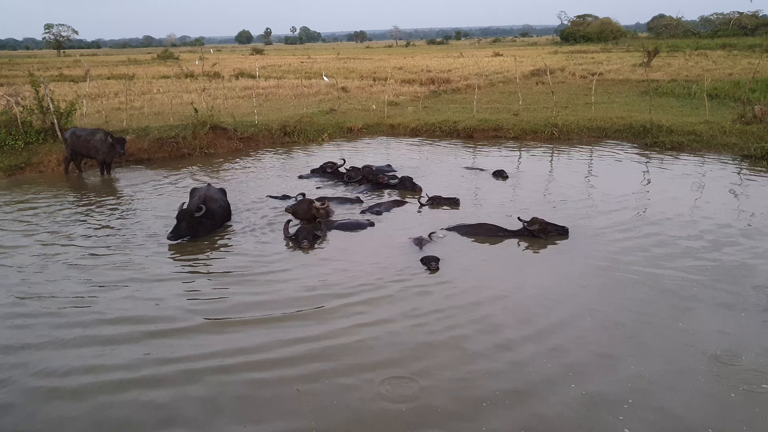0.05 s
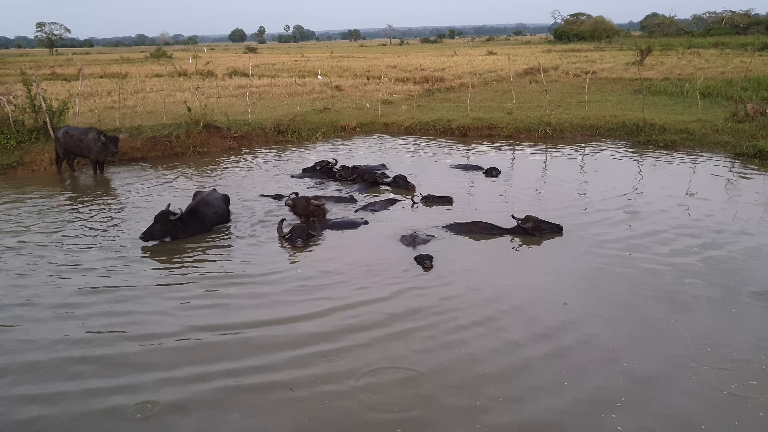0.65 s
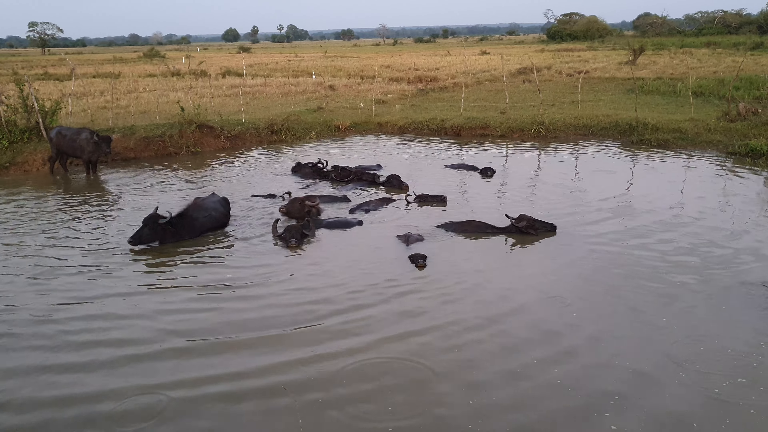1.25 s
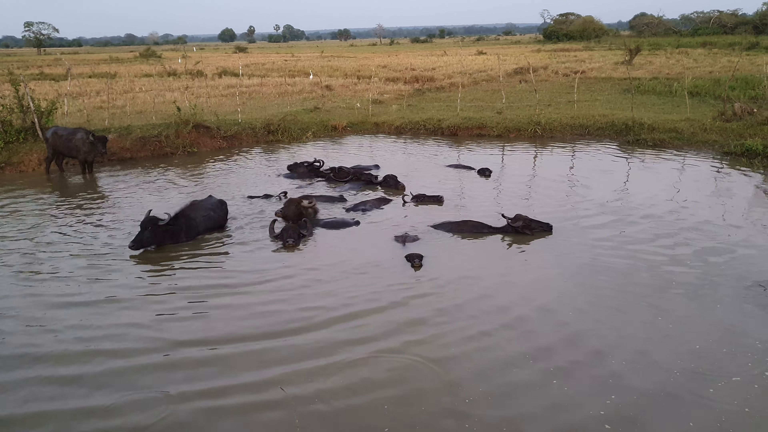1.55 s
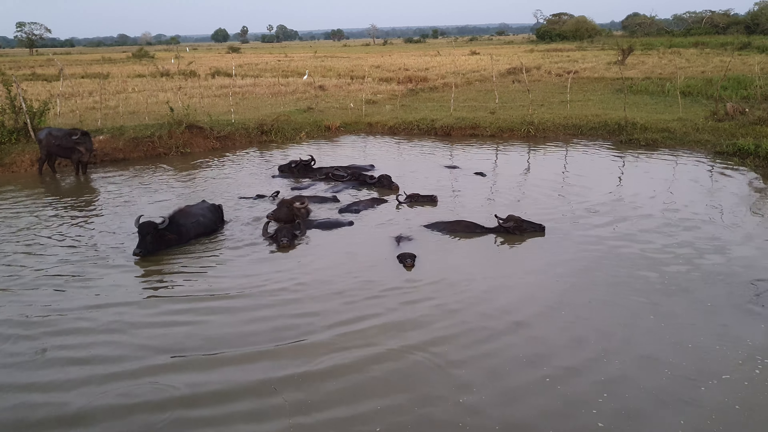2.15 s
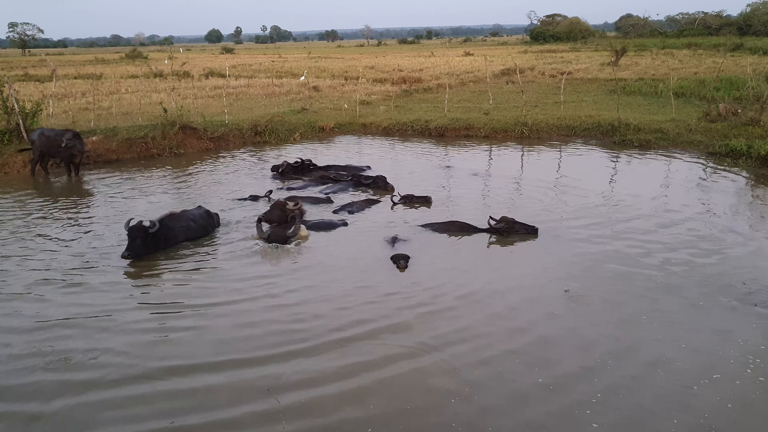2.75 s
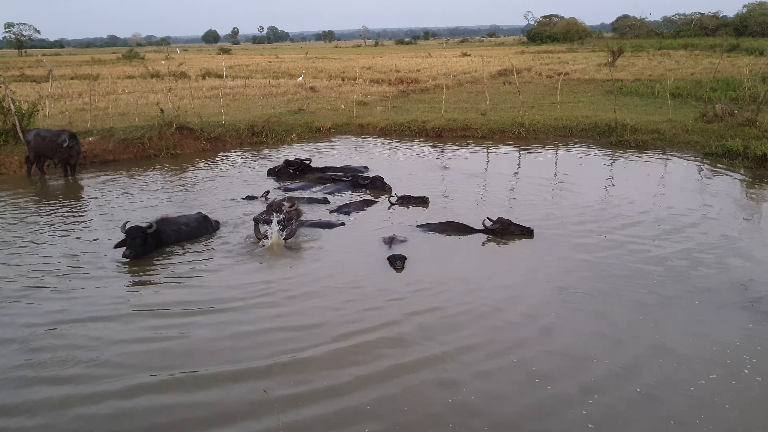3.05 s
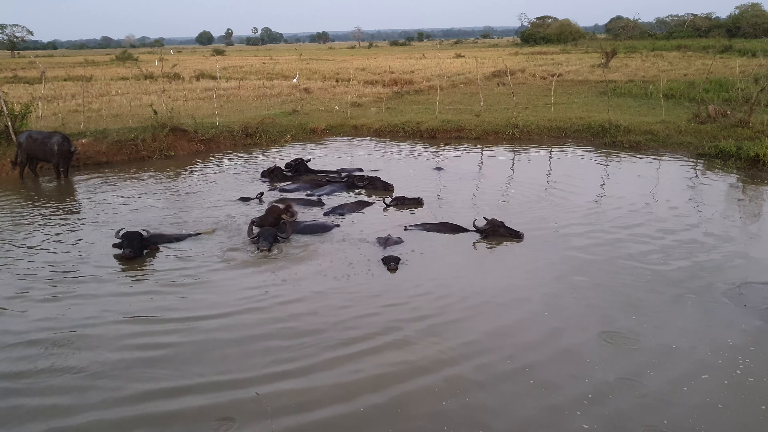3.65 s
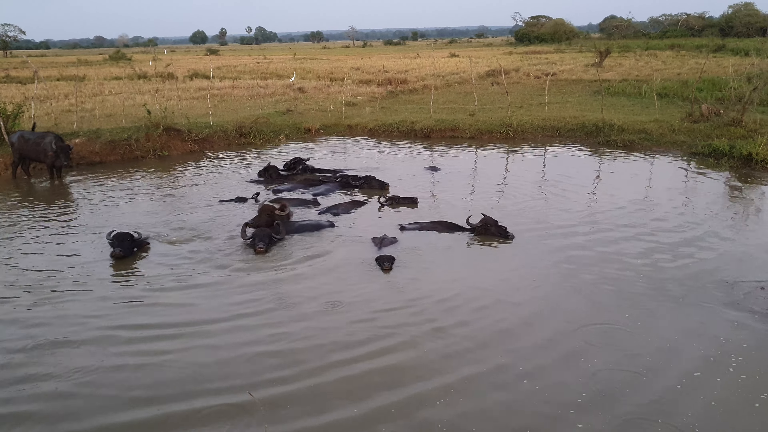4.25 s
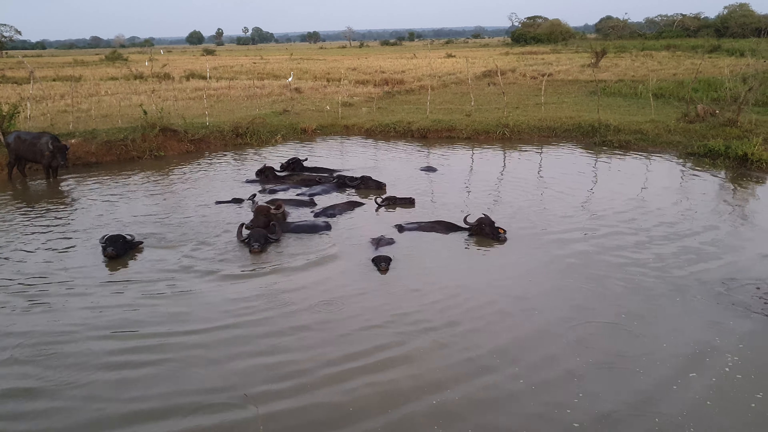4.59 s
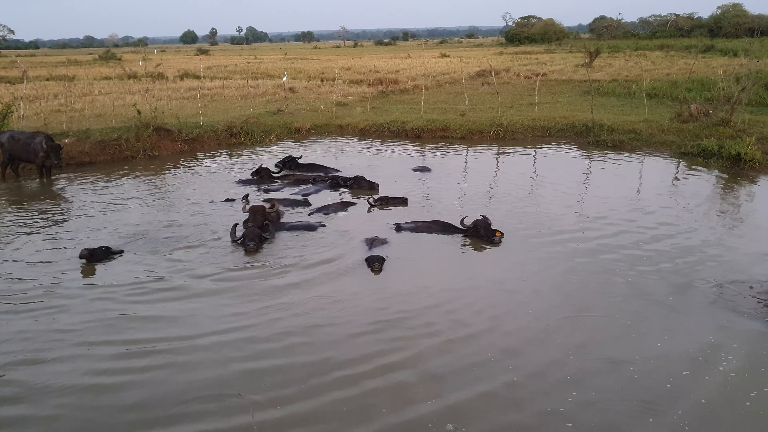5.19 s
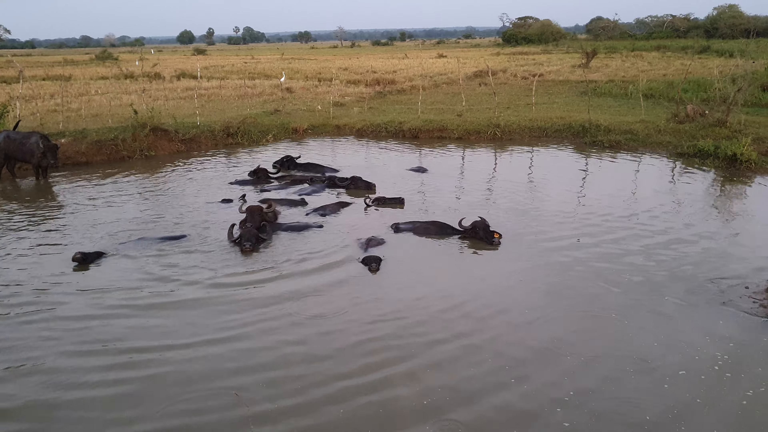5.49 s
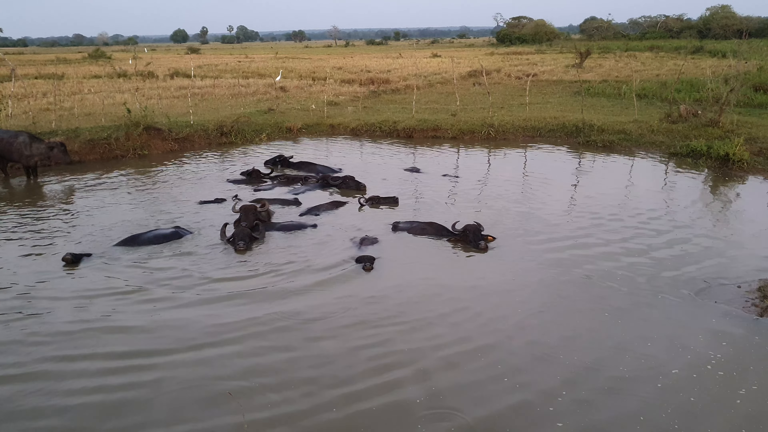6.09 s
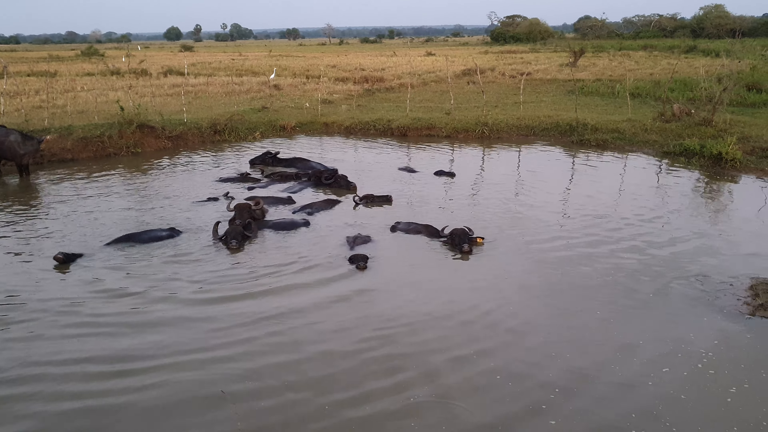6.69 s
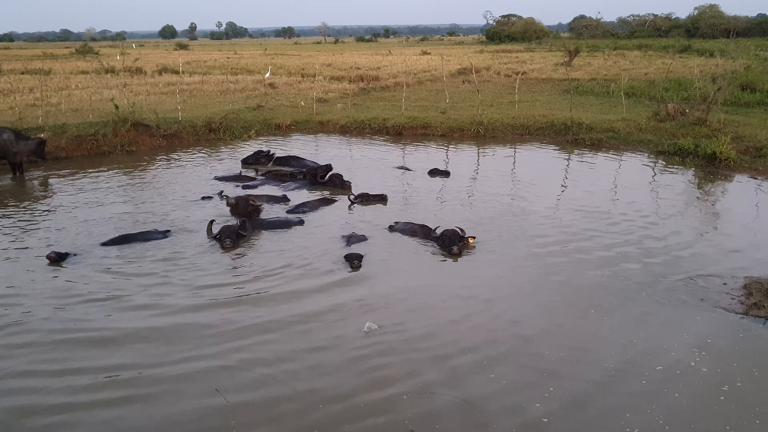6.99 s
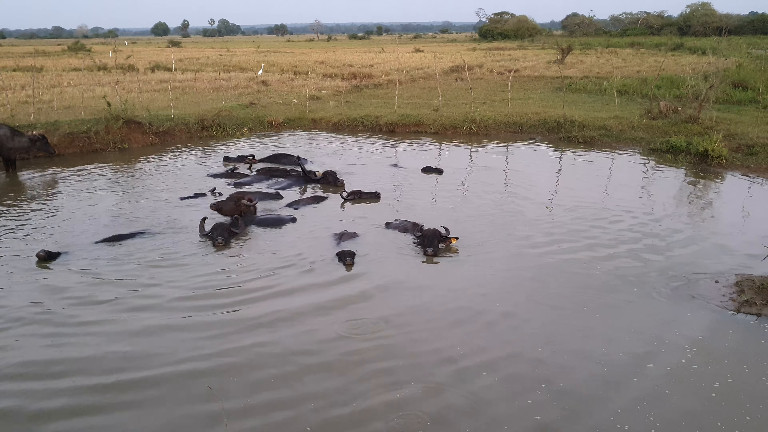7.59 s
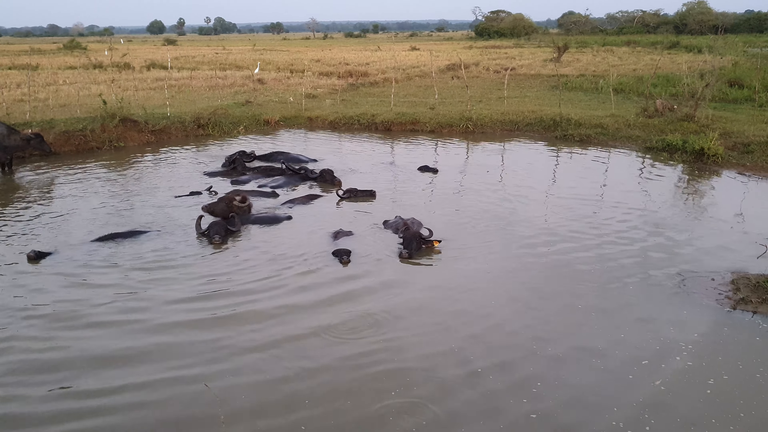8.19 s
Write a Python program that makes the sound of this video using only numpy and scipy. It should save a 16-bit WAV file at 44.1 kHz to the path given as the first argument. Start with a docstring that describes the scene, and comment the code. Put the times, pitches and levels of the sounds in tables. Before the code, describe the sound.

Wind buffets the microphone over buffalo wallowing in a pond, with surging splashes, plops, faint bird chirps and insects.

```python
"""Wind rumbles and thumps as gusts buffet the two microphone ports in turn.
Water buffalo wallow in a pond some way off: heaving and wading bodies drive surges of ringing
bubbles and spray, and water pours back with slaps and plops. A small bird slurs a few notes,
then repeats a quick two-note chip. Insects hiss in the fields."""
import sys
import numpy as np
from scipy import signal
from scipy.fft import rfft, irfft, next_fast_len
from scipy.io import wavfile
from scipy.ndimage import map_coordinates

SR = 44100
rng = np.random.default_rng(int(sys.argv[2]) if len(sys.argv) > 2 else 0)


def master_out(mix):
    """Clip the mix to full scale and print it as 16-bit PCM to the path in sys.argv[1]."""
    frames = np.transpose(np.atleast_2d(mix))
    ceiling = np.clip(frames, -1, 1)
    pcm = np.round(ceiling * 32767).astype(np.int16)
    wavfile.write(sys.argv[1], SR, pcm)


N = 372204

# fine spray spectrum: freq_hz, level_db
SPRAY_SPECTRUM = [(3000, -38), (6000, 8.5), (8000, -10), (9500, -1), (12000, -2.5), (14200, -0.5),
                  (15800, -5)]


def wind():
    """Each port has its own lumpy rumble; more swirl breaks it into finer, brighter eddies."""
    # spectra: freq_hz, level_db
    rumble_spectrum = [(12, -37), (25, -21.5), (45, -1), (62, 2.5), (100, -2), (150, -13), (220, -20),
                       (350, -47.5), (600, -79)]
    eddy_spectrum = [(50, -30), (110, -4), (180, 0.5), (280, -6.5), (400, -16.5), (600, -29), (1200, -95)]
    # single eddies hitting one port: centre_s, level_db, pitch_hz, port (0 left, 1 right)
    buffets = [(0.039, -16, 171, 1), (0.205, -20, 71.4, 0), (0.407, -18, 84, 1), (0.734, -26, 370, 0),
               (0.735, -6, 131, 0), (0.775, -16.5, 167, 0), (0.826, -16, 146, 1), (0.932, -16.5, 162, 1),
               (1.091, -17.5, 188, 1), (1.101, -14.5, 102, 0), (1.162, -13.5, 100, 0), (1.248, -19, 74, 1),
               (1.373, -16.5, 130, 1), (1.477, -14, 134, 1), (1.907, -16.5, 118, 1), (2.026, -11.5, 92, 1),
               (2.303, -20, 89, 1), (2.592, -16, 74, 1), (4.29, -16.5, 117, 1), (4.34, -19.5, 135, 1),
               (4.432, -18, 90.5, 1), (4.841, -26, 91, 1), (5.162, -18, 72.5, 0), (5.421, -19.5, 105, 1),
               (7.125, -15.5, 73.5, 0), (8.016, -21, 80, 0)]
    flow_db, swirl_db = air_flow()
    lumps = np.array([wobble(22), wobble(22)])
    rumble = amp(flow_db + 2) * unit(amp(2 * lumps) * coloured(noise(), rumble_spectrum))
    eddy_db = -46 + 1.77 * (swirl_db + 35) + np.array([[-5], [1]])
    eddies = amp(eddy_db) * unit(amp(5.5 * lumps) * coloured(noise(), eddy_spectrum))
    ports = rumble + eddies
    t = np.arange(-SR // 28, SR // 28) / SR
    for centre_s, level_db, pitch_hz, port in buffets:
        turns = np.arcsinh(t * pitch_hz * 2.965) / 2.07  # steep middle, slow flanks
        pressure = np.sin(2 * np.pi * turns + rng.uniform(0, 2 * np.pi)) * np.exp(-(turns / 0.71) ** 2)
        add(ports[int(port)], centre_s + t[0], amp(level_db - 3) * pressure)
    return ports


def air_flow():
    """Flow and swirl per port in dB: bell-shaped gusts, smooth or turbulent, ride on the breeze."""
    # breeze: time_s, left_db, right_db
    breeze = [(0, -42, -45.5), (.5, -45.5, -44.5), (.7, -36.5, -43), (1.25, -38, -34), (1.75, -40, -35.5),
              (2.2, -43.5, -41.5), (2.6, -41, -39.5), (3.55, -50, -42.5), (4.2, -43.5, -40),
              (4.6, -39, -40.5), (5.05, -42.5, -41.5), (5.35, -51, -36), (5.85, -49.5, -48.5),
              (6.45, -54, -52.5), (6.75, -43.5, -50), (7.25, -50.5, -58), (7.6, -49.5, -53),
              (8.44, -41, -49)]
    # gusts: centre_s, length_s, level_db, swirl_relative_db, port (0 left, 1 right)
    gusts = [(0.039, 0.038, -30.5, 0.5, 1), (0.285, 0.17, -32.5, -3, 1), (.6, 0.076, -30.5, -10, 0),
             (0.747, 0.07, -19.5, -4.5, 0), (.89, 0.093, -32, 1, 1), (1.132, 0.15, -30, -1.5, 0),
             (1.453, 0.1, -29.5, 3.5, 1), (2.11, 0.3, -32.5, 0, 1), (2.645, 0.082, -29.5, -17, 1),
             (3.157, 0.13, -32, -3.5, 1), (3.368, 0.11, -35.5, -5, 0), (3.848, 0.28, -33.5, -7, 1),
             (3.93, 0.086, -34.5, -8, 0), (4.13, 0.083, -31.5, -8, 1), (4.394, 0.19, -29.5, -2.5, 1),
             (4.837, 0.065, -26.5, 1, 1), (5.148, 0.1, -33.5, -2.5, 1), (5.317, 0.037, -29.5, 1, 1),
             (5.736, 0.072, -34.5, -4.5, 1), (6.01, 0.14, -35, -3, 1), (6.617, 0.032, -33.5, -7, 0),
             (7.0, 0.03, -29.5, -2, 1), (8.049, 0.097, -32, -10, 0), (8.328, 0.044, -32, 0, 0)]
    t = np.arange(N) / SR
    flow = amp(curves(breeze)) ** 2
    swirl = flow.copy()
    for centre_s, length_s, level_db, swirl_relative_db, port in gusts:
        gust = amp(level_db) ** 2 * np.exp(-(2 * (t - centre_s) / length_s) ** 2)
        flow[int(port)] += gust
        swirl[int(port)] += gust * amp(swirl_relative_db) ** 2
    return 10 * np.log10(flow), 10 * np.log10(swirl)


def water():
    """Mid and side: wading bodies gulp big bubbles, falling water makes small ones, spray crackles."""
    # spectra: freq_hz, level_db
    slosh_spectrum = [(120, -31), (230, 2), (340, -3.5), (440, -14), (570, -2), (800, 0), (1100, -3.5),
                      (1600, -3), (2300, -6.5), (5000, -61)]
    splash_spectrum = [(700, -28), (1400, -5.5), (2000, -4), (2350, -7), (2700, -2.5), (3000, -8.5),
                       (3400, -1), (4200, -2.5), (5200, -5), (6700, -6.5), (7600, -19), (10000, -18.5),
                       (15000, -41)]
    slosh_db, splash_db, spray_db = water_motion()
    churn = wobble(28)
    big = bubbles(per_s=450, centre_hz=785.4, spread=1.118, cycles=8.85, scatter_db=2.5, samples=1400)
    slosh = coloured(big + noise(), slosh_spectrum)
    small = bubbles(per_s=800, centre_hz=3244, spread=1.065, cycles=23, scatter_db=4, samples=500)
    splash = coloured(small + 1.47 * noise(), splash_spectrum)
    fine = bubbles(per_s=1500, centre_hz=10500, spread=0.99, cycles=0.9, scatter_db=3, samples=60)
    spray = coloured(fine + 0.5 * noise(), SPRAY_SPECTRUM)
    return (amp(slosh_db - 0.5) * unit(slosh * amp(0.78 * churn + wobble(15)))
            + amp(splash_db - 5.5) * unit(splash * amp(2 * churn))
            + amp(spray_db + 1.5) * unit(spray * amp(2.4 * churn)))


def water_motion():
    """Slosh, splash and spray in dB: each surge crests, then drains into the herd's general stir."""
    # stir between surges: time_s, level_db
    stir = [(0.0, -73), (0.73, -71.5), (0.91, -69), (1.74, -75.5), (2.61, -67.5), (2.72, -55), (2.87, -57),
            (3.15, -57.5), (3.81, -54.5), (4.28, -60), (4.63, -55.5), (5.31, -65), (5.66, -72), (5.99, -61),
            (6.82, -59), (7.29, -85), (7.64, -54), (8.44, -53)]
    # shares of the stir: slosh_db, splash_db, spray_db
    shares_db = [-2.5, 1.5, -20.5]
    # a body heaves or wades: crest_s, rise_s, fall_s, slosh_db, splash_db, spray_db
    surges = [(.1, .5, 0.48, -66.5, -84, -89), (.2, 0.12, 0.42, -67, -63, -79),
              (.92, 0.33, 0.35, -66, -64.5, -83), (1.19, 0.051, 0.07, -61, -66, -83),
              (1.48, 0.51, 0.27, -71.5, -65, -77), (2.02, 0.22, 0.18, -60, -60.5, -82),
              (2.36, 0.11, 0.034, -68.5, -57, -92), (2.52, 0.25, 0.35, -63.5, -83, -77),
              (2.73, 0.14, 0.068, -53.5, -55, -75), (2.91, 0.1, 0.17, -45, -45, -64),
              (3.45, 0.39, 0.31, -57, -52, -67), (3.87, 0.46, 0.45, -49, -57, -61.5),
              (4.76, 0.46, 0.29, -53.5, -64, -80), (5.17, 0.1, 0.18, -60.5, -54, -75),
              (5.6, 0.31, 0.31, -56.5, -52.5, -69), (6.07, 0.17, 0.093, -68, -50, -66),
              (6.64, 0.31, 0.17, -84, -50, -67), (6.96, 0.28, 0.26, -53, -49.5, -64),
              (7.52, 0.39, 0.31, -54.5, -49, -71), (7.95, 0.15, 0.17, -47, -43.5, -67)]
    depth_db, roundness = 17.5, 1.25
    t = np.arange(N) / SR
    power = amp(curves(stir) + np.array(shares_db)[:, None]) ** 2
    for crest_s, rise_s, fall_s, *layers_db in surges:
        from_crest = np.maximum((crest_s - t) / rise_s, (t - crest_s) / fall_s)
        envelope = amp(-depth_db * np.minimum(from_crest, 10) ** roundness)
        power += np.outer(amp(layers_db), envelope) ** 2
    return 10 * np.log10(power)


def slaps():
    """Mid and side: falling water smacks, trapped air resonates, mist lifts, big bubbles plop."""
    # smack spectrum: freq_hz, level_db
    smack_spectrum = [(300, -20), (800, -1), (1500, -3.5), (2700, 2.5), (4000, 2.5), (6500, -1.5),
                      (7800, -10.5), (15000, -26)]
    # water hitting the surface: start_s, level_db, mist_relative_db, tone_hz
    impacts = [(0.184, -42, -15.5, 5000), (0.83, -55, -8, 8000), (0.89, -44.5, -32, 3000),
               (0.9183, -48.5, -30, 3200), (0.9537, -40.5, -35, 3020), (1.1757, -39, -36, 1000),
               (1.195, -45, -24, 2200), (1.9127, -35.5, -29, 6500), (2.4886, -46, -16, 6050),
               (2.6753, -33, -18.5, 6200), (2.7814, -38.5, -17, 5500), (2.8654, -55, -12, 6000),
               (2.8933, -36, -24, 1600), (3.4424, -38, -16, 2600), (4.3402, -36, -29, 5800),
               (4.727, -42, -32, 2600), (5.437, -37, -40, 6000), (5.5204, -37, -36, 1200),
               (5.633, -46.5, -14, 5000), (5.74, -38, -22, 5540), (5.874, -46, -24, 1000),
               (5.9883, -37.5, -23, 1000), (6.4886, -37.5, -24, 3520), (6.561, -49, -9, 3500),
               (6.6243, -37.5, -18, 4530), (6.773, -39, -20, 3340), (6.897, -39, -28, 3500),
               (6.908, -36, -42, 950), (7.5353, -43.5, -24, 1200), (7.7, -53, -24, 1000)]
    # big bubbles: time_s, pitch_hz, level_db
    plops = [(0.24, 1430, -47), (0.275, 1940, -44.5), (0.867, 1570, -41.5), (1.177, 800, -39.5),
             (2.715, 730, -34), (2.781, 678, -26), (2.868, 1600, -37), (2.895, 1722, -36),
             (2.904, 880, -37), (3.038, 2600, -34.5), (3.355, 1430, -37.5), (3.444, 2550, -36),
             (3.905, 790, -33), (4.728, 2470, -32.5), (4.782, 676, -35), (5.99, 1010, -33),
             (6.777, 775, -34), (6.905, 850, -31), (7.537, 1150, -29.5)]
    tone_db, half_width_octaves = 7.5, 0.56
    smack_attack_s, mist_attack_s = 0.00082, 0.0042
    hits, mist_gain = np.zeros((2, N)), np.zeros(N)
    body, mist = coloured(noise(), smack_spectrum), coloured(noise(), SPRAY_SPECTRUM)
    t = np.arange(SR // 8) / SR
    decay = amp(-60 * t / 0.039) + 0.073 * amp(-60 * t / 0.13)
    smack = (1 - np.exp(-t / smack_attack_s)) * decay
    puff = (1 - np.exp(-t / mist_attack_s)) * decay
    for start_s, level_db, mist_relative_db, tone_hz in impacts:
        tone = lambda hz: amp(tone_db * np.exp(-(np.log2((hz + 1) / tone_hz) / half_width_octaves) ** 2))
        burst = body[:, int(start_s * SR):][:, :len(t)]
        add(hits, start_s, amp(level_db - 10.5) * smack * filtered(burst, tone))
        add(mist_gain, start_s, amp(level_db + mist_relative_db + 8.5) * puff)
    for time_s, pitch_hz, level_db in plops:
        plop = bubble(t, pitch_hz, cycles=17 * np.sqrt(pitch_hz / 1000), rise=0.14)
        add(hits[0], time_s - 0.004, amp(level_db - 3.5) * plop)
    return hits + mist_gain * mist


def bubbles(per_s, centre_hz, spread, cycles, scatter_db, samples):
    """Mid and side: a random stream of bubbles of mixed pitch and strength."""
    onset, up, down, chance, angle = np.hsplit(rng.random((int(per_s * N / SR), 5)), 5)
    pitch_hz = np.minimum(centre_hz * np.exp(spread * (up - down)), SR / 3)
    strength = amp(-scatter_db * np.log(np.maximum(chance, np.exp(-4))))
    mid = strength * bubble(np.arange(samples) / SR, pitch_hz, cycles, rise=0.25)
    side = mid * np.cos(2 * np.pi * angle)
    index = (onset * N).astype(int) + np.arange(samples)
    return np.array([unit(np.bincount(index.ravel(), rings.ravel(), N)[:N]) for rings in (mid, side)])


def bubble(t, pitch_hz, cycles, rise):
    """A bubble rings for some cycles, rising in pitch as it nears the surface."""
    age = t * pitch_hz / cycles
    ring = np.sin(2 * np.pi * cycles * (age + rise * age ** 2 / 2))
    return ring * np.exp(-3 * age) * (1 - np.exp(-2 * t * pitch_hz))


def pond_to_ports(mid_side):
    """Mid and side to left and right: bass alike at both ports, the left louder and slightly earlier."""
    # likeness of the ports: freq_hz, correlation
    likeness = [(200, 1), (700, 1), (1400, 0.48), (3000, 0.16), (6000, 0.6), (12000, 0.063)]
    # left over right: freq_hz, level_db
    balance = [(200, 2.7), (700, 7.1), (1300, 4.4), (1900, 6.7), (2500, 11.8), (4000, 7.6), (6000, 11),
               (8500, 1.3), (11500, 6.4), (15000, 20)]
    # left ahead of right: time_s, lead_s
    lead = [(3.9, 0.00012), (5.0, 0.00031)]
    side_gain = lambda hz: np.tan(np.arccos(np.clip(along(likeness, hz), -0.5, 1)) / 2)
    left_share = lambda hz: 1 / (1 + amp(-along(balance, hz)))
    mid, side = mid_side[0], filtered(mid_side[1], side_gain)
    left = filtered(mid + side, lambda hz: 2 * left_share(hz))
    right = filtered(mid - side, lambda hz: 2 * (1 - left_share(hz)))
    shift_samples = curves(lead)[0] * SR / 2
    return np.array([map_coordinates(left, [np.arange(N) + shift_samples], order=5),
                     map_coordinates(right, [np.arange(N) - shift_samples], order=5)])


def bird():
    """Thin whistles, husky with pitch noise: evenly paced pairs of falling chips and softer slurs."""
    # runs of calls: first_s, last_s, level_db
    runs = [(3.263, 4.205, -48.5), (4.402, 5.136, -48), (5.352, 6.271, -52), (6.5, 6.688, -50.5),
            (7.183, 7.366, -57), (7.749, 7.945, -48.5), (8.192, 8.389, -47.5)]
    # the two chips of a call: delay_s, relative_db, start_hz
    call = [(0, 1.5, 4615), (0.078, -3.5, 4110)]
    # slurred notes: start_s, length_s, start_hz, middle_hz, end_hz, level_db
    slurs = [(0.048, .16, 1850, 2094, 2120, -67), (0.115, 0.14, 3300, 3370, 2800, -63),
             (1.129, 0.062, 4050, 4200, 3500, -56.5), (1.24, .08, 3550, 4000, 3250, -60.5),
             (1.552, 0.069, 4200, 4500, 4900, -60), (1.66, 0.35, 5730, 6050, 6350, -72)]
    period_s, chip_s, fall_ratio = 0.19, 0.0149, 0.64
    song = np.zeros(N)
    u = np.linspace(0, 1, int(chip_s * SR))
    for first_s, last_s, level_db in runs:
        for call_s in np.linspace(first_s, last_s, round((last_s - first_s) / period_s) + 1):
            for delay_s, relative_db, start_hz in call:
                pitch_hz = start_hz * rng.normal(1, 0.02) * fall_ratio ** u
                chip = np.abs(np.sin(np.pi * u)) ** 0.38 * whistle(pitch_hz, husk=0.23)
                add(song, call_s + delay_s, amp(level_db + relative_db + rng.normal(0, 1)) * chip)
    for start_s, length_s, *contour_hz, level_db in slurs:
        u = np.linspace(0, 1, int(length_s * SR))
        pitch_hz = np.polyval(np.polyfit([0, 0.5, 1], contour_hz, 2), u)
        add(song, start_s, amp(level_db) * np.sin(np.pi * u) * whistle(pitch_hz, husk=0.15))
    return song * amp([[0], [-7]])


def whistle(pitch_hz, husk):
    """A sine glide with relative pitch noise."""
    rough_hz = pitch_hz * (1 + husk * rng.standard_normal(len(pitch_hz)))
    return np.sin(2 * np.pi * np.cumsum(rough_hz) / SR)


def banks(x, t60_s, wet_db):
    """Banks and bushes scatter a short, weak echo."""
    t = np.arange(SR // 2) / SR
    tail = rng.standard_normal((2, len(t))) * amp(-60 * t / t60_s) * (t > 0.008)
    return x + amp(wet_db) * signal.fftconvolve(x, tail / np.linalg.norm(tail[0]), axes=1)[:, :N]


def fields():
    """Open-air hush and a steady, finely shimmering insect chorus."""
    # spectra: freq_hz, level_db
    hush_spectrum = [(60, -25), (300, 5), (450, -2.5), (650, -10), (1200, -12), (2500, -38.5), (5000, -18),
                     (8000, -24), (11000, -31), (15800, -35)]
    insect_spectrum = [(4500, -37), (5900, -15.5), (6450, -7), (6750, 0.5), (6900, 3), (7100, -5),
                       (7450, -18), (8300, -14), (9300, -15.5), (10300, -30.5), (13000, -47)]
    hush = amp([[-61], [-69]]) * coloured(noise(), hush_spectrum)
    chorus = amp([[-62.5], [-65]]) * coloured(noise(), insect_spectrum)
    shimmer_db = 1.7 * wobble(45) + 0.69 * wobble(2.47)
    return hush + chorus * amp(shimmer_db)


def amp(db):
    return 10 ** (np.asarray(db) / 20)


def unit(x):
    return x / np.sqrt(np.mean(x ** 2) + 1e-20)


def along(points, hz):
    """Interpolate (freq_hz, value) points on a log axis."""
    freq_hz, values = np.transpose(points)
    return np.interp(np.log(hz + 1), np.log(freq_hz + 1), values)


def curves(rows):
    """One value per sample for each column after time_s."""
    time_s, *columns = np.transpose(rows)
    return np.array([np.interp(np.arange(N) / SR, time_s, column) for column in columns])


def wobble(knots_per_s):
    """A smooth random curve."""
    knots = rng.standard_normal(int(N * knots_per_s / SR) + 4)
    return map_coordinates(knots, [np.arange(N) * knots_per_s / SR])


def filtered(x, response):
    """Apply the gain response(hz)."""
    size = x.shape[-1]
    padded = next_fast_len(size + 8192)
    return irfft(rfft(x, padded) * response(np.fft.rfftfreq(padded, 1 / SR)), padded)[..., :size]


def coloured(x, spectrum):
    """x shaped by a spectrum, at rms 1."""
    return unit(filtered(x, lambda hz: amp(along(spectrum, hz))))


def noise():
    return rng.standard_normal((2, N))


def add(track, start_s, sound):
    start = int(np.clip(round(start_s * SR), 0, N - 1))
    track[..., start:start + sound.shape[-1]] += sound[..., :N - start]


def scene():
    pond = pond_to_ports(water() + slaps())
    return banks(pond + bird(), t60_s=0.15, wet_db=-7.5) + fields() + wind()


def record(dry):
    """The camera keeps nothing above its band limit."""
    return filtered(dry, lambda hz: hz < 15850)


dry = scene()
out = record(dry)
master_out(out)
```